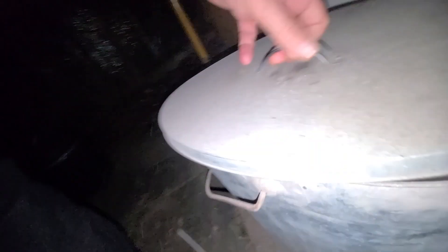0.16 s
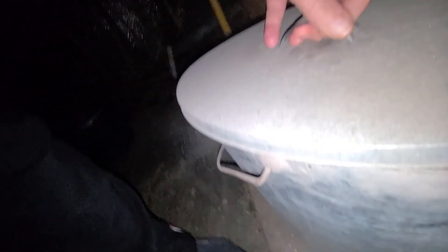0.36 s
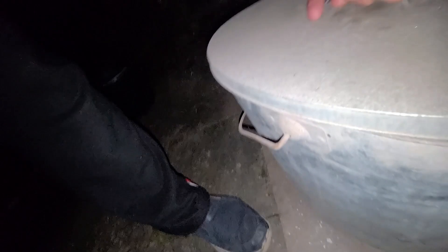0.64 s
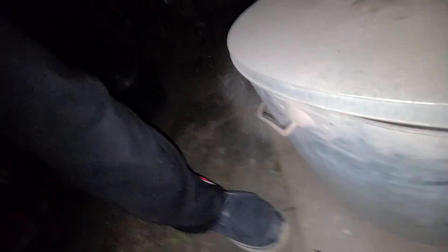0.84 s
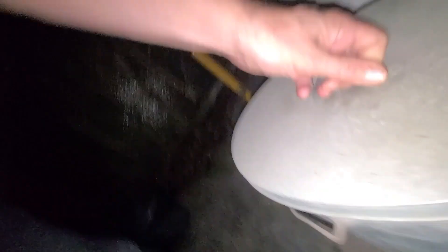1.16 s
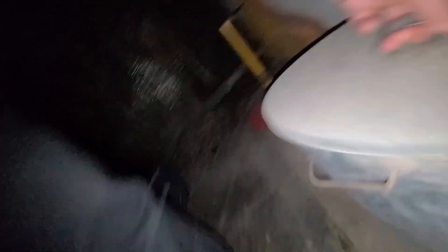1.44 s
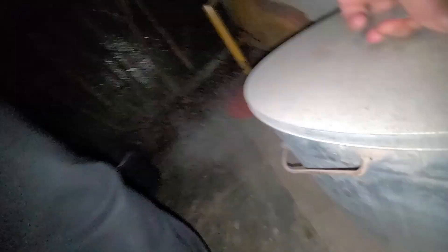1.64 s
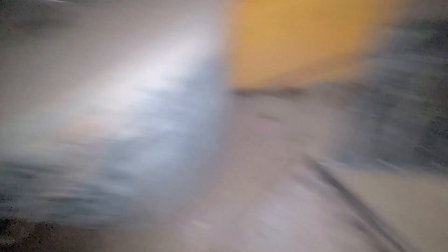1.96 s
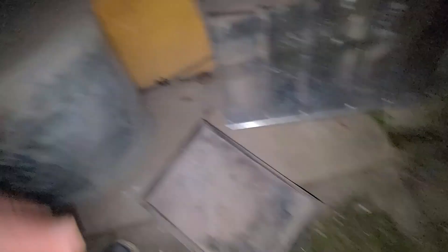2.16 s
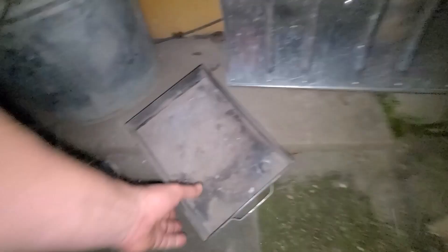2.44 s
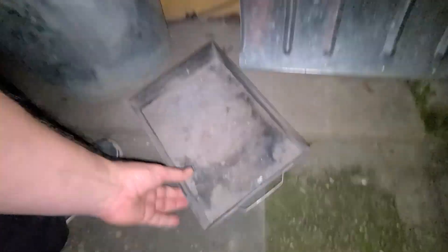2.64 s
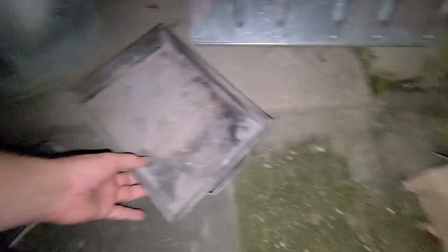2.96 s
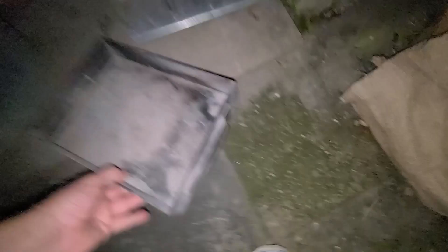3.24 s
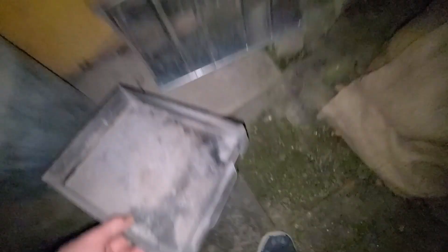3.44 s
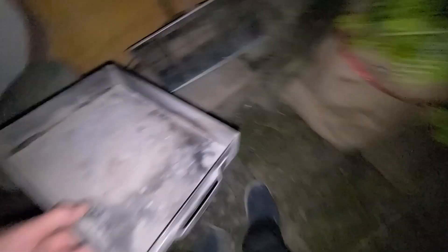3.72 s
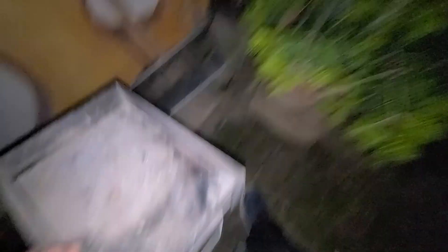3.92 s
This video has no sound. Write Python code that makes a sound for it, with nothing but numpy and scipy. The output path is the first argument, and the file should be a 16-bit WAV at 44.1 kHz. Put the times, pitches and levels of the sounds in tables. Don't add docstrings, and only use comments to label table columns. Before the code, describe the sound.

Close hand-held stereo in a small yard at night. A wire handle clacks and a loose lid rattles on a large metal bin, with hollow low booms and a hardest bang near one and a half seconds. Sleeve cloth rubs on the left, then a sheet-metal pan clanks and scrapes off concrete and rings on, fading over soft rustles.

```python
import sys
import numpy as np
from scipy import signal
from scipy.fft import rfft, irfft
from scipy.io import wavfile
from scipy.ndimage import uniform_filter1d

SR = 44100
rng = np.random.default_rng(int(sys.argv[2]) if len(sys.argv) > 2 else 0)


def volts_from_decibels(level):
    exponent = np.asarray(level, float) / 20
    return 10 ** exponent


def int16_out(signal):
    q = np.round(np.clip(np.atleast_2d(signal).T, -1, 1) * 32767)
    wavfile.write(sys.argv[1], SR, q.astype(np.int16))


N = 180324
TIME = np.arange(N) / SR
LIFT_S = 2.997
BIN_LAG = 13


def unit(x):
    return x / np.sqrt(np.mean(x ** 2))


def read(table, hz):
    table_hz, values = np.array(table)[:, 0], np.array(table)[:, 1]
    return np.interp(np.log(hz), np.log(table_hz), values)


def colour(x, table):
    hz = np.maximum(np.fft.rfftfreq(N, 1 / SR), 1)
    inside = (hz > table[0][0]) * (hz < table[-1][0])
    gain = volts_from_decibels(read(table, hz)) * inside
    return irfft(rfft(x) * gain / np.sqrt(np.mean(gain ** 2)), N)


def high(x, hz):
    return signal.sosfilt(signal.butter(N=2, Wn=hz, btype="high", fs=SR, output="sos"), x)


def walk(rate):
    k = int(SR / rate)
    steps = np.repeat(rng.standard_normal(N // k + 1), k)
    return unit(uniform_filter1d(steps, k)[:N])


def dips(rows):
    return volts_from_decibels(sum(db * np.exp(-((TIME - s) / width) ** 2) for s, width, db in rows))


def grit(spread_db, alike, count=0):
    size = unit(volts_from_decibels(spread_db * rng.exponential(size=N)))
    both, own = rng.standard_normal(N), rng.standard_normal((2, N))
    share = np.clip(alike, 0, 1)
    left, right = size * (np.sqrt(share) * both + np.sqrt(1 - share) * own)
    return np.array([left, np.roll(right, count)])


def bursts(s, db, t60, pan_db, rise_s):
    power = np.zeros((2, N))
    for at, level_db, decay, side_db in np.broadcast(s, db, t60, pan_db):
        span = slice(int(at * SR), int((at + .6) * SR))
        t = np.maximum(TIME[span] - at, 0)
        shape = (1 - np.exp(-t / rise_s)) * volts_from_decibels(level_db - 60 * t / max(decay, .01))
        power[:, span] += shape ** 2 * volts_from_decibels([[side_db], [-side_db]])
    return np.sqrt(power)


def blows(s, db, contact_s):
    impulses = np.zeros(N)
    impulses[(np.array(s) * SR).astype(int)] = volts_from_decibels(db) * rng.choice([-1, 1], len(s))
    push = np.hanning(int(contact_s * SR) + 3)
    return np.convolve(impulses, push / push.sum())[:N]


def ring(force, modes, side_db, lead):
    out, busy = np.zeros((2, N)), np.flatnonzero(force)
    for hz, db, t60, side, turn in np.broadcast(*np.transpose(modes), side_db, lead):
        span = slice(busy[0], busy[-1] + int(t60 * SR))
        pole = np.exp((2j * np.pi * hz - np.log(1000) / t60) / SR)
        left = volts_from_decibels(side / 2) * np.exp(.5j * turn)
        right = volts_from_decibels(-side / 2) * np.exp(-.5j * turn)
        mode = signal.lfilter([1], [1, -pole], force[span])
        out[:, span] += volts_from_decibels(db) * (np.array([[left], [right]]) * mode).imag
    return out


def pings(s, db, hz, t60, side_db, rise_s, count):
    sides = np.zeros((2, N))
    for at, level_db, note_hz, decay, pan_db in np.broadcast(s, db, hz, t60, side_db):
        span = slice(int(at * SR), int((at + decay) * SR))
        t = np.maximum(TIME[span] - at, 0)
        envelope = (1 - np.exp(-t / rise_s)) * volts_from_decibels(level_db - 60 * t / decay)
        note = envelope * np.sin(2 * np.pi * note_hz * t)
        sides[:, span] += note * volts_from_decibels(np.array([[pan_db], [-pan_db]]) / 2)
    return np.array([sides[0], np.roll(sides[1], count)])


def yard(x, t60, wet_db):
    t = TIME[:int(.4 * SR)]
    echoes = rng.standard_normal((2, len(t))) * volts_from_decibels(-60 * t / t60) * (t > .003)
    echoes = signal.lfilter([.4], [1, -.6], echoes)
    echoes = echoes / np.sqrt(np.sum(echoes ** 2) / 2)
    return x + volts_from_decibels(wet_db) * signal.fftconvolve(x, echoes, axes=1)[:, :N]


def night():
    # (frequency [Hz], density [dB per Hz])
    air_colour = [(88, -25.5), (150, 1.5), (477, 2.5), (1300, -5.5), (5650, -18), (7440, -12),
                  (11500, -25.5), (16300, -20)]
    level_db = -61 + 0.5 * walk(8.2) + np.array([[2.5], [-2.5]])
    return colour(grit(0, 0.069), air_colour) * volts_from_decibels(level_db)


def handling():
    # (time [s], level [dB])
    grip_levels = [(0.0, -37), (0.25, -37), (0.56, -40.5), (0.86, -42), (1.19, -40.5), (1.84, -39.5),
                   (2.25, -47.5), (2.5, -48), (2.62, -44.5), (2.85, -46), (3.1, -51), (3.4, -46),
                   (3.64, -51), (3.9, -45), (4.09, -49)]
    # (frequency [Hz], density [dB per Hz])
    rumble_colour = [(11, -41.5), (18, 0), (48, 9), (95, 3), (146, -8.5), (190, -12.5), (248, -13),
                     (300, -18.5), (390, -27.5), (660, -120)]
    db = np.interp(TIME, *np.transpose(grip_levels)) + 1.8 * walk(4.7)
    return volts_from_decibels(db) * colour(grit(0, 0.54), rumble_colour) * volts_from_decibels([[3.2], [-3.2]])


def ticks():
    # (time [s], peak level [dB], frequency [Hz], left minus right [dB])
    tick_events = [(0.1759, -6.5, 3300, 16), (0.666, -17, 5140, 8), (1.9257, -26.5, 3430, 13),
                   (2.464, -39.5, 273, 34), (2.675, -34, 11100, 23.5), (0.655, -16.5, 275, 1),
                   (2.366, -33, 5000, 26), (2.707, -40, 885, 17), (2.892, -44.5, 1504, 6),
                   (3.758, -36, 3000, 6), (3.925, -31, 330, -3)]
    s, db, hz, pan_db = np.transpose(tick_events)
    return pings(s, db, hz, 5 / hz + 0.00059, pan_db, 0.000082, count=0)


def reach():
    # (middle [s], half length [s], level [dB])
    s, half, db = (2.825, 0.079, -43)
    # (frequency [Hz], density [dB per Hz])
    cuff_colour = [(300, -9), (1600, 2.5), (3300, -8.5), (6000, -52)]
    envelope = volts_from_decibels(db - 14.0 * np.minimum(((TIME - s) / half) ** 4, 20))
    return envelope * colour(grit(2.5, 0.28), cuff_colour) * volts_from_decibels([[0], [-24]])


def flick():
    # (peak time [s], half length [s], level [dB])
    s, half, db = (1.218, 0.011, -31.5)
    # (frequency [Hz], density [dB per Hz])
    edge_colour = [(900, -24), (1500, 7.5), (3500, 1), (6000, -9), (11000, -30), (16000, -18)]
    envelope = volts_from_decibels(db - 10 * np.minimum(((TIME - s) / half) ** 2, 20))
    return envelope * colour(grit(1.1, 0.25), edge_colour) * volts_from_decibels([[0], [-14]])


def sleeve():
    # (frequency [Hz], density [dB per Hz])
    crisp_colour = [(470, -12), (800, -3.5), (948, -2), (1450, 0.5), (2130, -3.5), (5900, -11.5),
                    (6500, -11), (9880, -61.5)]
    dull_colour = [(71, -28), (120, 4), (801, -3.5), (1040, -20), (1200, -9.5), (1560, -41.5), (2640, -120)]
    hiss_colour = [(4410, -67), (7500, -4), (9770, -7.5), (11800, -5), (15500, -10)]
    # (peak time [s], rise over 20 dB [s], fall over 20 dB [s], rustle [dB], hiss re rustle [dB])
    rubs = [(1.14, 0.046, 0.022, -44.5, -8), (1.77, 0.1, 0.02, -53, -4.5), (1.831, 0.075, 0.13, -39.5, -6),
            (1.937, 0.016, 0.029, -43.5, 3), (1.955, 0.054, 0.013, -43, -11),
            (2.012, 0.014, 0.066, -33, -12), (2.04, 0.029, 0.055, -33, -16.5),
            (2.071, 0.069, 0.027, -37, -13), (2.13, 0.057, 0.17, -56, -9.5),
            (2.368, 0.044, 0.062, -43.5, -9), (2.46, 0.36, 0.19, -51.5, -10), (2.545, .04, 0.081, -68, 6),
            (2.68, 0.065, 0.084, -60, -1.5), (2.709, 0.018, 0.22, -52, -7.5)]
    brushes = [
        (1.215, 0.033, 0.046, -33.5, -9.5),
        (1.698, 0.029, 0.2, -50.5, -8),
        (2.78, 0.066, 0.1, -54.5, -3.5),
        (2.902, 0.028, 0.14, -40, -0.5),
        (3.15, 0.19, 0.25, -45.5, -7),
        (3.38, 0.13, 0.3, -51.5, -9),
        (3.461, 0.04, 0.11, -39.5, -7.5),
        (3.505, 0.093, 0.029, -44.5, -8.5),
        (3.601, 0.083, 0.11, -51.5, -6),
    ]
    rustles = [(0.041, 0.18, 0.26, -35, -13), (0.131, 0.051, 0.25, -36.5, -9.5),
               (0.321, 0.12, 0.14, -41.5, -40), (.4, 0.07, 0.1, -47.5, -7), (.5, 0.054, 0.19, -52, -7),
               (.54, 0.024, 0.064, -49, -10), (0.601, 0.19, 0.24, -39, -14.5),
               (1.259, 0.036, 0.078, -48, -10), (1.329, 0.11, 0.33, -61, -6),
               (3.765, 0.018, 0.039, -39, -12), (3.87, 0.11, 0.12, -52.5, -14),
               (3.93, 0.023, 0.029, -52.5, -12.5), (4.04, 0.054, 0.045, -63, -36)]
    # (dull part re rustle [dB], left minus right [dB])
    stroke_kinds = [(1, 27), (-14, 15), (-3.5, 5.5)]
    slips = volts_from_decibels(2.0 * walk(90))
    crisp = colour(grit(0.99, 0.074), crisp_colour)
    dull = colour(grit(0.91, 0.89), dull_colour)
    hiss = colour(grit(2.2, 0.13), hiss_colour)
    power = np.zeros((3, 2, N))
    for strokes, (dull_db, pan_db) in zip((rubs, brushes, rustles), stroke_kinds):
        sides = volts_from_decibels(np.array([[pan_db], [-pan_db]]) / 2)
        for s, rise, fall, db, hiss_db in strokes:
            before, after = (s - TIME) / max(rise, .004), (TIME - s) / max(fall, .004)
            away = np.where(TIME < s, before, after)
            envelope = volts_from_decibels(db - 20 * np.minimum(away, 3) ** 1.12) * (away < 3)
            gain = envelope * 2 * sides / sides.sum()
            parts = volts_from_decibels(np.array([0, dull_db, hiss_db]))[:, None, None]
            power += (gain * parts) ** 2
    return (np.sqrt(power) * np.array([crisp, dull, hiss])).sum(axis=0) * slips


def pan_song():
    turn_hz = (1072.5, 910.5, 911.2, 1275.5)
    # (left at lift [dB], right at lift [dB], left fade [dB per s], right fade [dB per s])
    song_levels = [(-22, -19.5, 19, 21.5), (-16.5, -15, 88, 61), (-35.5, -26, 20, 21.6), (-31, -29, 38, 34)]
    # (time [s], half width [s], gain [dB])
    high_dips = [
        [(3.325, 0.025, -17), (3.52, .07, -11.5), (3.975, 0.056, -13)],
        [(3.08, 0.081, -11)],
    ]
    low_dips = [
        [(3.38, 0.078, -9)],
        [(3.53, 0.036, -7)],
    ]
    top_dips = [
        [(3.54, 0.046, 6)],
        [(3.49, 0.023, -20)],
    ]
    # (time [s], lead of left port [rad])
    tilt = [(3.05, -.4), (3.16, 1), (3.25, 2), (3.37, .8), (3.51, -1.8), (3.9, -2.1), (4.09, -1.4)]
    t, out = np.maximum(TIME - LIFT_S, 0), 0
    leads = (np.interp(TIME, *np.transpose(tilt)), -1.7, -1.6, -1.2)
    hollows = (high_dips, [[], []], low_dips, top_dips)
    for hz, levels, lead, (left_dips, right_dips) in zip(turn_hz, song_levels, leads, hollows):
        left_db, right_db, left_fade, right_fade = levels
        phase = 2 * np.pi * hz * TIME
        left = volts_from_decibels(left_db - left_fade * t) * dips(left_dips) * np.sin(phase + lead)
        right = volts_from_decibels(right_db - right_fade * t) * dips(right_dips) * np.sin(phase)
        out = out + np.array([left, right])
    return out * (1 - np.exp(-t / .03))


def pan_ring():
    # (frequency [Hz], level [dB], t60 [s], left minus right [dB])
    pan_modes = [(321, -13, 1.3, -1), (422, -13, .37, -6), (587, -3, .32, -1), (630, -2, .9, 0),
                 (647, -5, .6, 4), (769, -1, .56, -8), (950, 8, .5, -5), (992, -5, .41, -2),
                 (1182, -10, .37, 3), (1245, -8, .4, 9), (1270, -3, .5, 6), (1096, -8, .35, 2),
                 (1372, -4, .4, 10), (1610, -5, .58, 0),
                 (1754, -6, .9, 1), (1787, -8, .65, 0), (2039, -2, .7, -1), (1995, -8, .6, 0),
                  (2293, -7, .68, -5), (2459, -1, .5, 5), (2551, -4, .42, -8), (2744, -3, .39, 10),
                  (2960, -2, .49, 0), (3102, 0, .33, 3), (3413, -12, .32, 7), (3619, -8, .75, -6),
                  (3624, -21, .7, -4), (2985, -3, .5, 3)]
    # (frequency [Hz], level [dB], t60 [s])
    rim_modes = [(3295, -8, 0.19), (3500, -4, 0.16), (3570, -4, 0.22), (3680, -1, 0.17),
                 (3881, -12.5, 0.55), (3900, -6, 0.17), (4530, -24, 0.55), (4750, -14.5, 0.31)]
    sway_db, sway_per_s, left_lag_s = 4, 8, 0.00017
    rim = [(hz, db - 7.0, min(t60, .5), 3) for hz, db, t60 in rim_modes]
    free = np.array(pan_modes + rim)
    force = bursts([LIFT_S - .012], 0, 0.21, 0, 0.0053)[0]
    chance = rng.random(len(free))
    out = 0
    for (hz, db, t60, side_db), turn in zip(free, chance):
        swell = force * np.cos(2 * np.pi * (hz * TIME + turn))
        tone = ring(2 * swell / force.sum(), [(hz, db, t60)], side_db, -2 * np.pi * hz * left_lag_s)
        sway = np.sin(2 * np.pi * (sway_per_s * (.4 + turn) * TIME + turn * hz))
        out = out + tone * volts_from_decibels(sway_db * sway)
    grip = volts_from_decibels(-90 * np.maximum(TIME - 3.4, 0))
    return volts_from_decibels(-23.0) * grip * out


def pan_clank():
    # (time [s], blow [dB], scrape [dB], bright part [dB], scrape t60 [s])
    clank_events = [(2.89, -66, -43, -62, 0.055), (2.9182, -10, -9.5, -23, 0.077),
                    (2.926, -12.5, -14.5, -36, 0.18), (2.942, -20, -18.5, -48.5, 0.27),
                    (2.956, -8.5, -17, -44, 0.33), (2.9781, 1, -13.5, -7, 0.06), (2.986, 0, -27, -23.5, .1),
                    (2.996, -6.5, -25, -21, 0.15), (3.014, -2.5, -5.5, -15.5, 0.088),
                    (3.044, -4.5, -28, -30.5, 0.13), (3.069, -13, -26.5, -31.5, 0.33)]
    # (frequency [Hz], width [Hz], level [dB])
    grounded_modes = [(415, 22, -9), (632, 40, 7), (1100, 24, -3), (1373, 16, 6), (1717, 20, -13),
                      (1893, 22, -9), (2039, 16, -3), (2390, 26, -8), (2545, 18, -1), (2790, 60, -9),
                      (3140, 28, -10), (3485, 30, -10), (4000, 26, -12), (4488, 24, -6)]
    # (frequency [Hz], density [dB per Hz])
    scrape_colour = [(88, -45.5), (150, -19), (516, 0.5), (609, -16), (859, 3.5), (1350, -1), (1510, -6.5),
                     (4000, -34), (5200, -59.5), (8800, -120)]
    ash_colour = [(1470, -13.5), (2500, 2.5), (4130, -1.5), (4260, -5.5), (4610, -5.5), (5390, -8.5),
                  (12200, -20.5), (15300, -21), (16300, -47)]
    # (frequency [Hz], left minus right [dB])
    pan_balance = [(250, -31), (500, -18.5), (800, 13), (1350, 9.5), (2300, 7), (4500, -5.5)]
    lag = -14
    s, blow_db, scrape_db, bright_db, t60 = np.transpose(clank_events)
    scrape = grit(2.74, 0.071, count=lag) * bursts(s, scrape_db, t60, 0, 0.0019)
    force = blows(s, blow_db, .00012) + volts_from_decibels(-22.5) * scrape[0]
    held = [(hz, db, 1.75 * np.log(1000) / np.pi / width) for hz, width, db in grounded_modes]
    hz = np.transpose(grounded_modes)[0]
    damped = ring(force, held, read(pan_balance, hz), 2 * np.pi * hz * lag / SR)
    damped *= volts_from_decibels(-190 * np.maximum(TIME - LIFT_S - .015, 0))
    ash_grit = grit(1.2, 0.11, count=lag) * bursts(s, bright_db, 1.4 * t60, 0.71, 0.00061)
    ash = colour(ash_grit, ash_colour)
    return high(volts_from_decibels(-16.0) * damped, 220) + volts_from_decibels(-3.0) * colour(scrape, scrape_colour) + volts_from_decibels(-5.0) * ash


def buzzes():
    # (time [s], peak level [dB],
    # frequency [Hz], t60 [s])
    buzz_events = [(0.15, -30, 3180, .05), (0.203, -16, 3226, 0.062), (0.226, -40, 5900, .05),
                   (0.598, -30, 5500, 0.055), (0.704, -28, 1910, .06), (0.742, -22, 2940, .05),
                   (0.743, -24.5, 5450, 0.1), (0.776, -26, 3940, .05), (0.964, -23.5, 4270, 0.13),
                   (0.964, -28.5, 6100, .07), (0.964, -24.5, 8640, 0.054), (1.02, -36, 5880, 0.083),
                   (1.032, -28.5, 2700, 0.076), (1.05, -40, 5600, 0.093), (1.21, -29.5, 2290, 0.065),
                   (1.261, -47.5, 5170, .12), (1.426, -26, 4640, 0.068), (1.5, -23, 1805, .12),
                   (1.444, -23.5, 5600, .07), (1.467, -29, 14500, .03), (1.474, -25.5, 9300, .03),
                   (1.69, -42, 3100, .15), (2.55, -67, 6450, 0.67), (2.979, -20, 4650, 0.041),
                   (2.991, -21, 2640, 0.087), (3.021, -20, 2510, .07), (3.046, -20, 2620, .07)]
    # (time [s], peak level [dB], frequency [Hz], t60 [s])
    loop_notes = [
        (0.176, -7, 1825, 0.072),
        (0.227, -36, 2680, 0.57),
        (0.24, -41, 2860, 0.6),
    ]
    s, db, hz, t60 = np.transpose(buzz_events)
    chatter = np.array([walk(700), walk(700)])
    rough = chatter * pings(s, db, hz, t60, 7.1, 0.0016, count=BIN_LAG)
    return rough + pings(*np.transpose(loop_notes), 12, 0.0025, count=BIN_LAG)


def sizzle():
    # (time [s], peak level [dB], t60 [s])
    touches = [(0.1486, -31.5, .09), (0.175, -23, 0.15), (0.1984, -27.5, 0.14), (0.2245, -18, 0.15),
               (0.2494, -29, .11), (0.4693, -41, 0.18), (0.5297, -37, 0.13), (0.5821, -36, .09),
               (0.5954, -34, 0.16), (0.6669, -28.5, 0.13), (0.7028, -32, .09), (0.7184, -32.5, 0.11),
               (0.742, -30, .09), (0.7544, -27, 0.13), (0.7736, -26, 0.12), (0.8184, -39, 0.12),
               (0.9595, -25, 0.15), (1.0174, -33.5, 0.13), (1.0344, -37, 0.15), (1.421, -35, .09),
               (1.4267, -32, 0.12), (1.4424, -26, 0.11), (1.4551, -20, .09), (1.4676, -18.5, .08),
               (1.4744, -17.5, 0.086), (1.4894, -28, 0.08), (1.5024, -35.5, 0.065), (1.5788, -42, .025),
               (1.5874, -47, .02), (1.5943, -24, 0.078), (1.6094, -44.5, .09)]
    # (frequency [Hz], density [dB per Hz])
    sizzle_colour = [(6000, -17.5), (7300, 3), (9500, -4.5), (12000, -9.5), (15900, -18.5)]
    s, db, t60 = np.transpose(touches)
    fine_grit = grit(2.5, 0.11, count=BIN_LAG) * bursts(s, db - 7.5, t60, 7.1, 0.0011)
    return colour(fine_grit, sizzle_colour)


def clinks():
    # (time [s], peak level [dB], frequency [Hz], t60 [s])
    clink_events = [
        (0.23, -41, 5130, 0.25),
        (0.25, -27, 2200, 0.26),
        (0.25, -35.5, 1470, .55),
        (0.176, -17, 1490, 0.054),
        (1.419, -35, 4700, .15),
        (1.426, -37, 3500, 0.068),
        (1.426, -30, 5700, 0.09),
        (1.443, -23, 4800, 0.092),
    ]
    s, db, hz, t60 = np.transpose(clink_events)
    return (.6 + .8 * walk(250)) * pings(s, db, hz, t60, 6, .002, count=BIN_LAG)


def booms():
    # (time [s], peak level [dB], frequency [Hz], t60 [s])
    boom_events = [(0.0, -24, 127.4, 0.18), (0.72, -27, 591, 0.24), (0.845, -29, 717, 0.28),
                   (0.963, -19.5, 538, 0.17), (1.13, -25, 125, 0.1), (2.921, -30, 984, 0.23),
                   (3.85, -33.5, 54, 0.14), (0.149, -17, 97, 0.26), (0.178, -16.5, 131.8, 0.28),
                   (0.224, -23, 112, 0.44), (0.473, -24, 125, 0.13), (0.536, -25, 124.5, 0.26),
                   (0.594, -15.5, 134.4, 0.49), (0.672, -10, 137, 0.25), (0.69, -11, 106.8, 0.62),
                   (0.749, -9.5, 87.8, 0.26), (0.763, -9, 80.5, 0.25), (0.818, -17, 119, 0.18),
                   (0.96, -11, 103.5, 0.29), (1.016, -10.5, 108, 0.29), (1.265, -20.5, 63.6, 0.072),
                   (1.418, -21.5, 117, 0.33), (1.457, -1.5, 130, 0.07), (1.488, -7.5, 103, 0.14),
                   (1.592, -15, 109, 0.12), (1.899, -25.5, 81.6, 0.21), (2.007, -37.5, 147, 0.089),
                   (2.599, -33, 91, 0.12), (2.72, -34, 103, 0.056), (2.92, -21.5, 322, 0.24),
                   (3.032, -30, 214, 0.21), (3.426, -33, 67.6, 0.13)]
    s, db, hz, t60 = np.transpose(boom_events)
    return pings(s, db, hz, t60, 3.3, 0.0014, count=BIN_LAG)


def bin_lid():
    # (time [s], clatter peak [dB], bright clatter [dB], rim note [Hz], rattle t60 [s])
    knocks = [(0.148, -31, -22.5, 1670, 0.083), (0.175, -16, -11, 1900, 0.076),
              (0.199, -21.5, -22, 1560, 0.19), (0.225, -18.5, -17.5, 3240, 0.18),
              (0.25, -17.5, -26.5, 1800, 0.2), (0.465, -30.5, -47.5, 1630, 1),
              (0.583, -31, -38, 1850, 0.13), (0.596, -19.5, -35.5, 1980, 0.15),
              (0.667, -21, -30.5, 5340, 0.03), (0.679, -15, -40, 1430, 0.21),
              (0.698, -6, -32.5, 2480, 0.049), (0.703, -38, -29, 1830, 0.13), (0.719, -37, -41, 1900, 0.52),
              (0.74, -19.5, -27.5, 3420, 0.11), (0.7495, -3.5, -28, 5540, 0.14),
              (0.7555, -18, -25, 1830, 0.076), (0.774, -30, -25, 1630, 0.11),
              (0.819, -16, -36.5, 2120, 0.14), (0.961, -8, -28, 4300, 0.14),
              (1.018, -13.5, -35, 1687, 0.19), (1.4177, -12.5, -44, 1680, 0.21),
              (1.427, -17.5, -30, 4900, 0.079), (1.442, -21.5, -23.5, 5800, 0.17),
              (1.4536, 2, -17, 1270, 0.16), (1.467, -24, -11.5, 1820, 0.035),
              (1.478, -24, -10.5, 2310, 0.062), (1.49, -27.5, -29, 3320, 0.064),
              (1.514, -33, -46, 1720, 0.067), (1.579, -41, -55, 7200, 0.042),
              (1.592, -11.5, -41, 1320, 0.033), (1.595, -19, -23, 2930, 0.07)]
    # (frequency [Hz], level [dB], t60 [s])
    drum_modes = [(169.5, -6, 0.16), (251.7, 0, 0.18), (347, -7, 0.13), (411, 1, 0.049), (532.4, -6, 0.23),
                  (592, -16.5, 0.4), (787, -8, 0.34), (840, -39, 0.2)]
    # (lowest frequency [Hz], highest frequency [Hz], t60 [s])
    low_hz, top_hz, ring_s = (1100, 6200, 0.085)
    # (frequency [Hz], density [dB per Hz])
    dull_clatter = [(88, -37.5), (150, -0.5), (382, -11.5), (749, -13.5), (821, -13), (988, -19.5),
                    (1790, -20), (3500, -44.5), (4550, -70)]
    bright_clatter = [(530, -20), (900, -16), (1150, -15), (1840, -11), (2320, -16), (3210, -16.5),
                      (4140, -21.5), (5820, -18.5), (7000, -26), (8500, -39.5)]
    s, clatter_db, bright_db, rim_hz, t60 = np.transpose(knocks)
    pan_db = 8 - 0.31 * bright_db
    hz = np.transpose(drum_modes)[0]
    wall = ring(blows(s, clatter_db, 0.00071), drum_modes, 0.56, 2 * np.pi * hz * BIN_LAG / SR)
    low_bursts = bursts(s, clatter_db - 11.5, 2.13 * t60, pan_db / 4, 0.0028)
    low = colour(grit(0.8, 0.82, count=BIN_LAG) * low_bursts, dull_clatter)
    rattle = grit(2.6, .4, count=BIN_LAG) * bursts(s, bright_db, t60, pan_db / 2, .0016)
    taps = blows(s, bright_db, .0001)
    chance = rng.standard_normal((4, 36))
    sheet_hz = np.geomspace(low_hz, top_hz, num=36) * (1 + .015 * chance[0])
    sheet_db = 0.8 * chance[1] + read(bright_clatter, sheet_hz)
    sheet = np.transpose([sheet_hz, sheet_db, ring_s * volts_from_decibels(0.71 * chance[2])])
    lid = ring(rattle[0] + 12 * taps, sheet, 4 * chance[3], 2 * np.pi * sheet_hz * BIN_LAG / SR)
    crack = colour(rattle + 6 * np.array([taps, np.roll(taps, BIN_LAG)]), bright_clatter)
    rim = walk(400) * pings(s, bright_db - 6, rim_hz, .05, pan_db / 2, .0004, count=BIN_LAG)
    sheet_sound = volts_from_decibels(-.7) * crack + volts_from_decibels(-30) * high(lid, 700)
    return volts_from_decibels(-12.5) * high(wall, 110) + low + sheet_sound + rim


def scene():
    echoing = yard(bin_lid() + clinks() + pan_clank(), 0.19, -10.5)
    metal = echoing + booms() + pan_ring() + pan_song() + sizzle() + buzzes()
    at_phone = ticks() + sleeve() + handling() + reach() + flick()
    return metal + at_phone + night()


def band_limit(x):
    return signal.sosfilt(signal.butter(12, 16450, fs=SR, output="sos"), x)


def record(dry):
    # (frequency [Hz], gain [dB])
    port_response = [(18, -17.5), (40, -1), (6200, 0), (6800, -2.5), (7600, -5.5), (9000, -1), (13000, 2.5)]
    shaded = dry - np.array([[0], [.4]]) * high(dry, 10000)
    hz = np.maximum(np.fft.rfftfreq(N, 1 / SR), 1)
    heard = irfft(rfft(shaded) * volts_from_decibels(read(port_response, hz)), N)
    top_cut = signal.ellip(N=10, rp=.2, rs=60, Wn=15750, fs=SR, output="sos")
    finished = np.clip(signal.sosfilt(top_cut, heard), -1, 1)
    return band_limit(finished)


dry = scene()
out = record(dry)
int16_out(out)
```